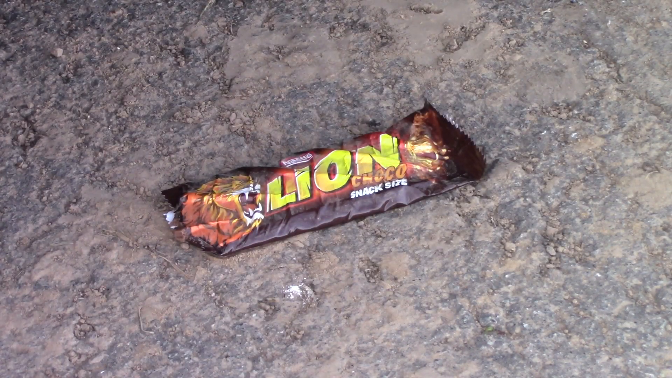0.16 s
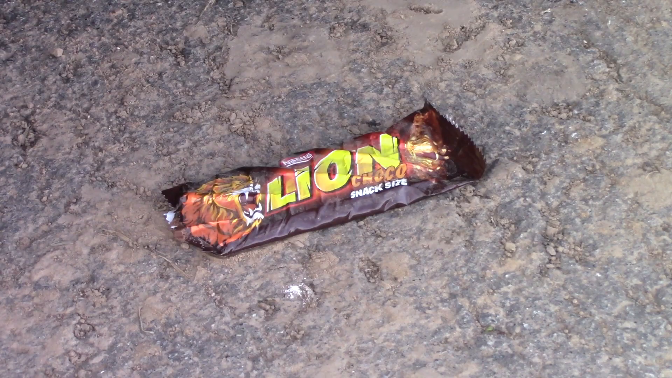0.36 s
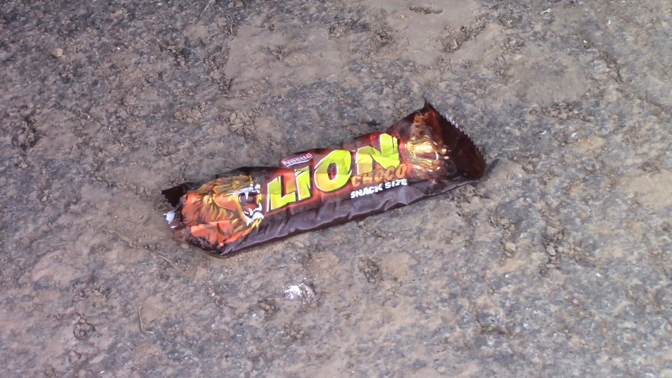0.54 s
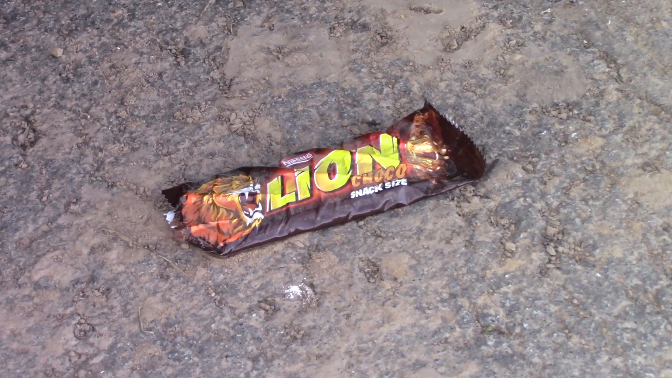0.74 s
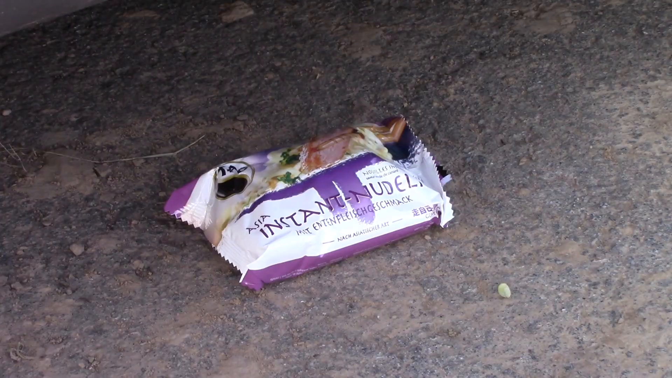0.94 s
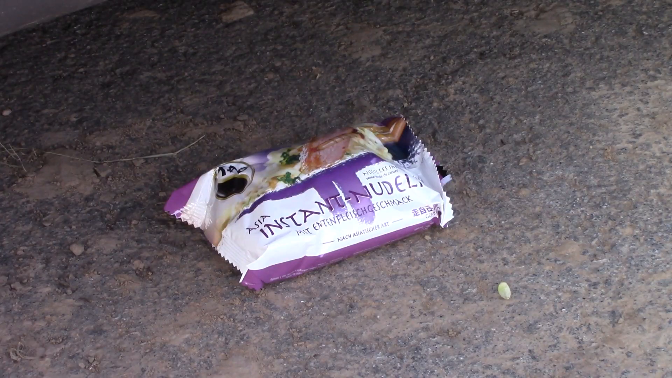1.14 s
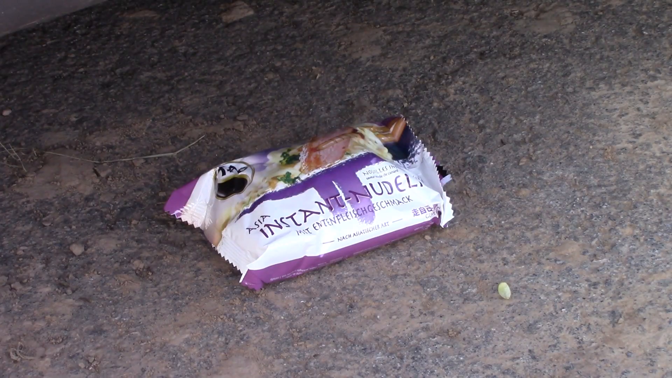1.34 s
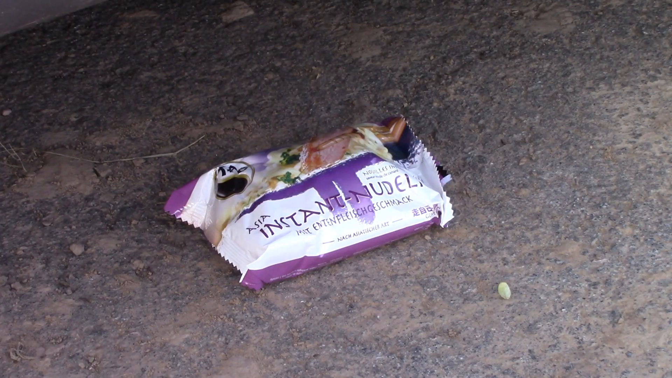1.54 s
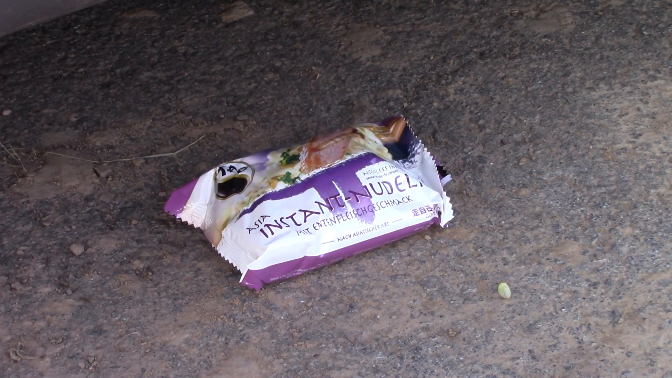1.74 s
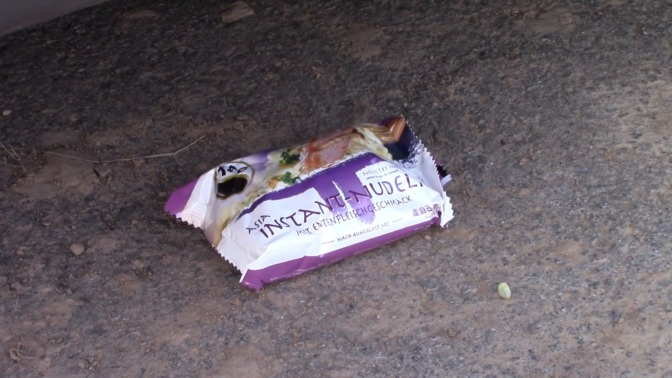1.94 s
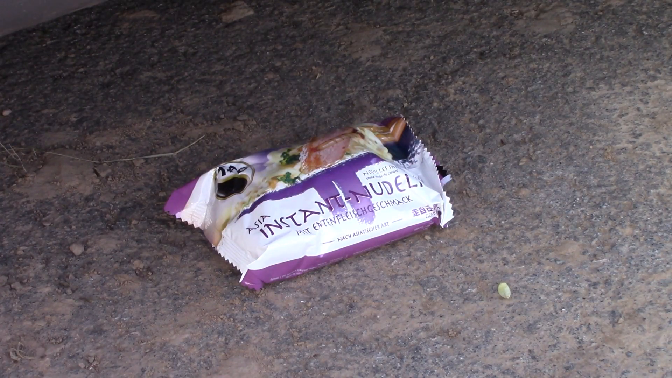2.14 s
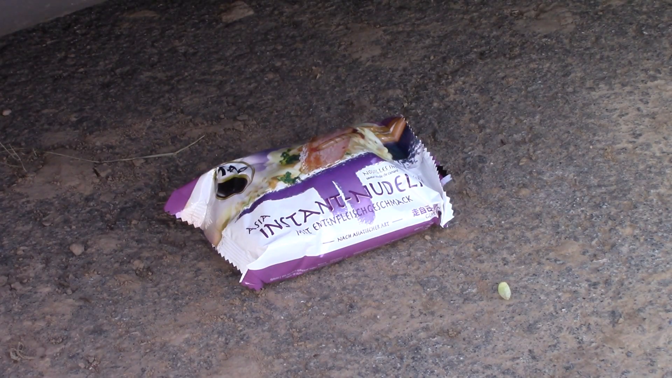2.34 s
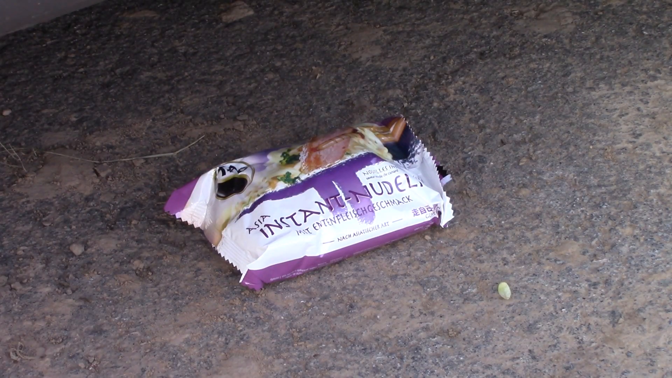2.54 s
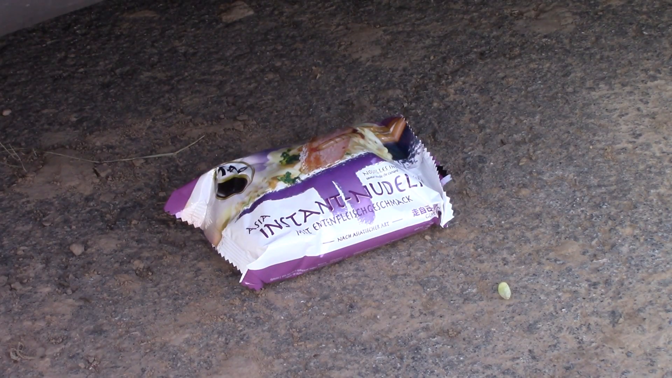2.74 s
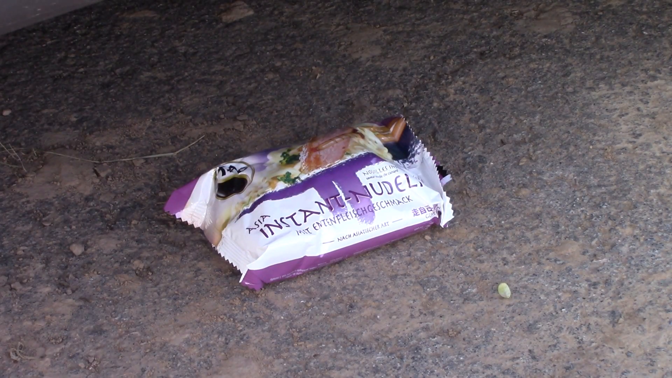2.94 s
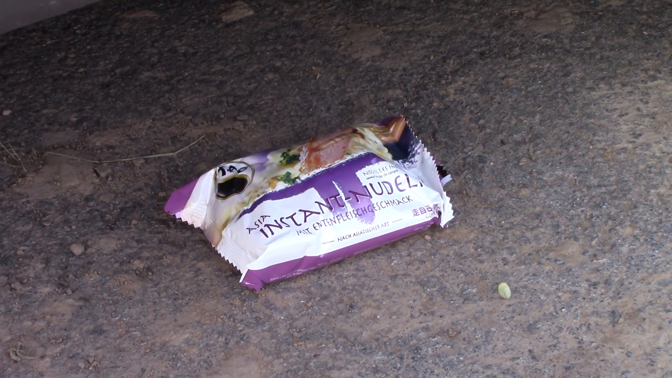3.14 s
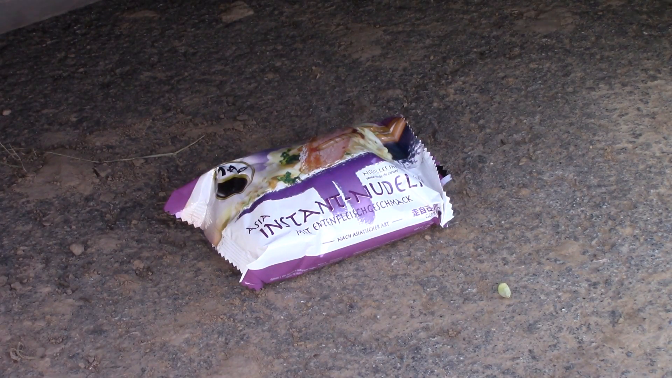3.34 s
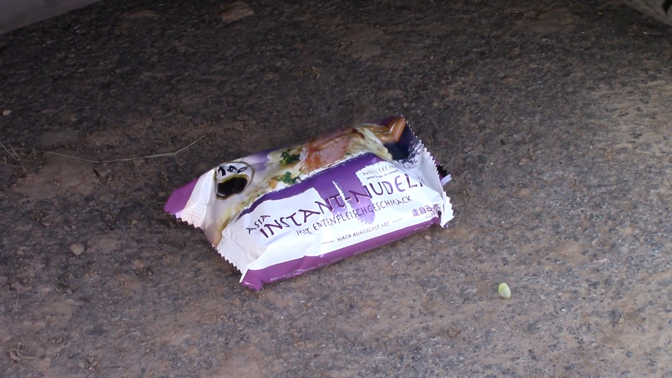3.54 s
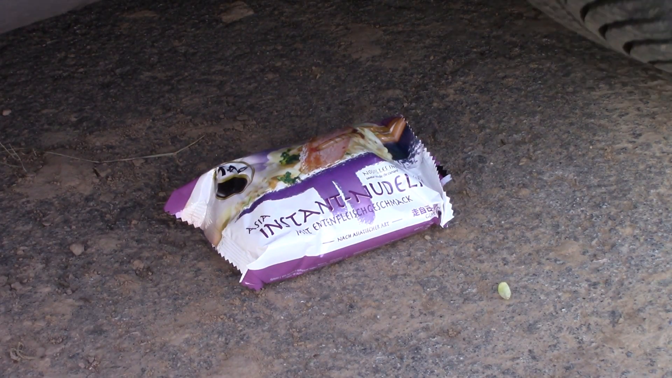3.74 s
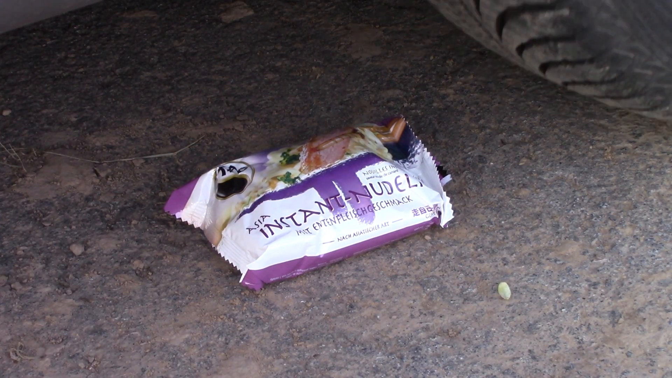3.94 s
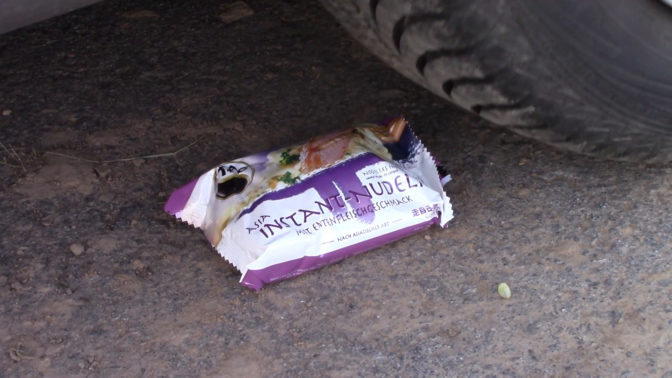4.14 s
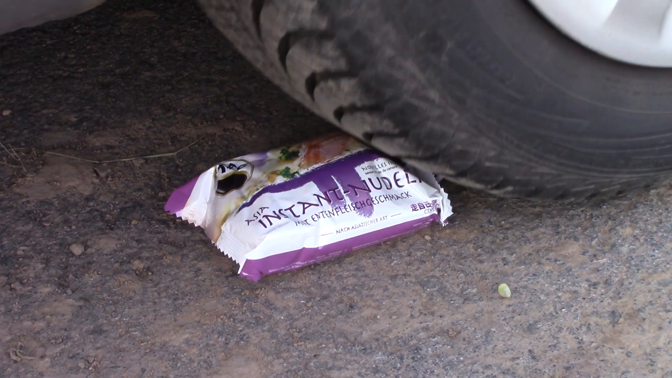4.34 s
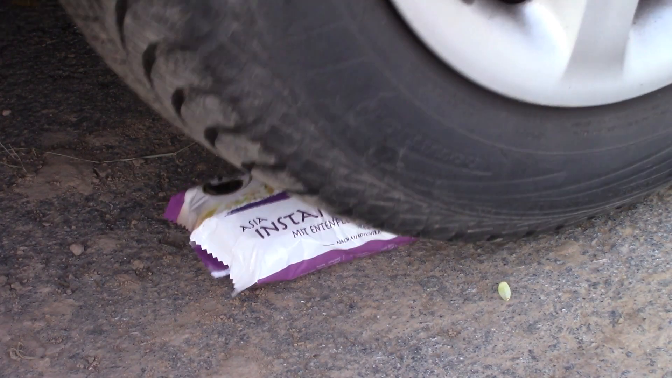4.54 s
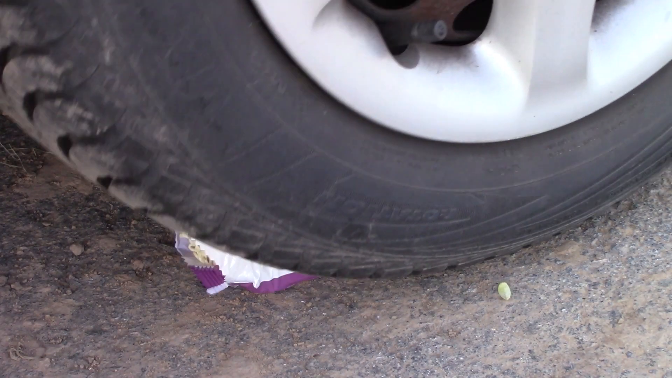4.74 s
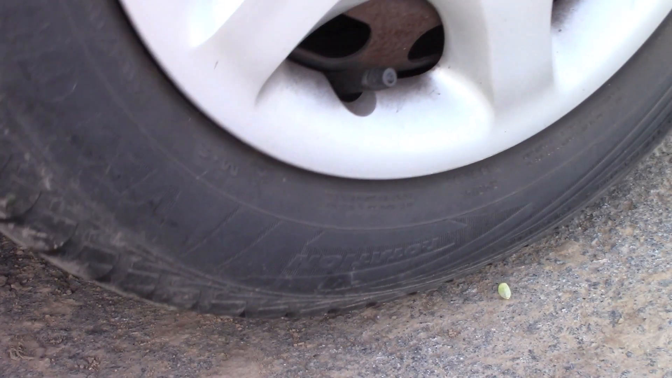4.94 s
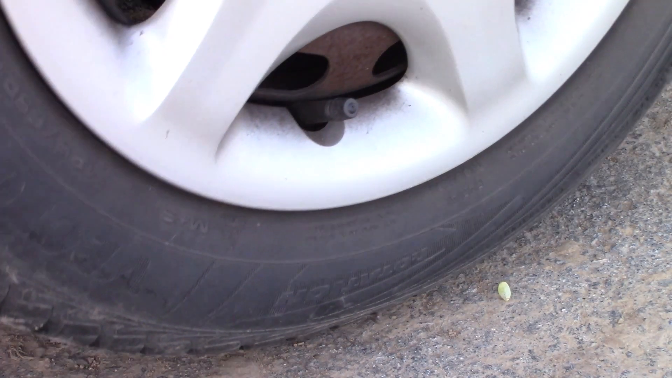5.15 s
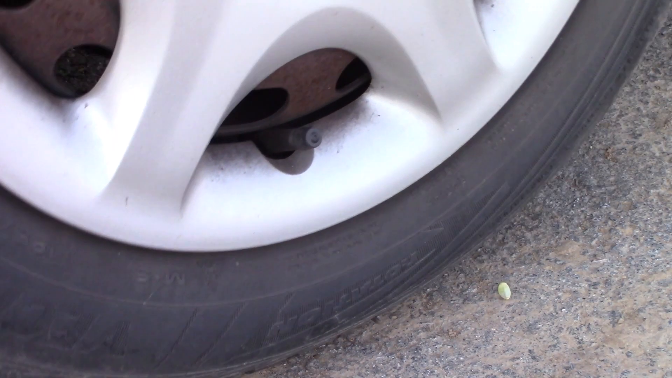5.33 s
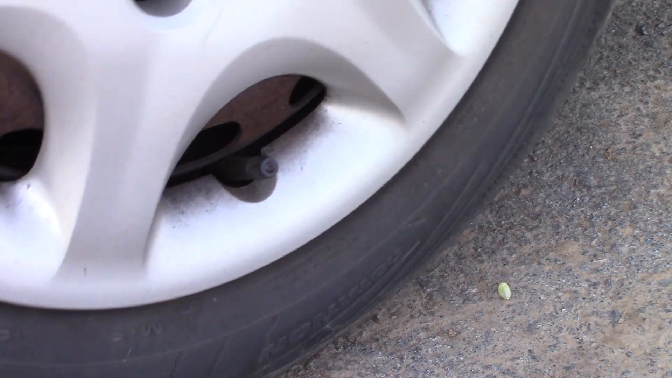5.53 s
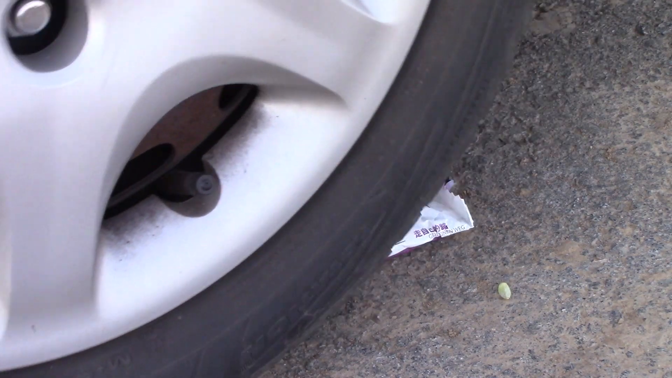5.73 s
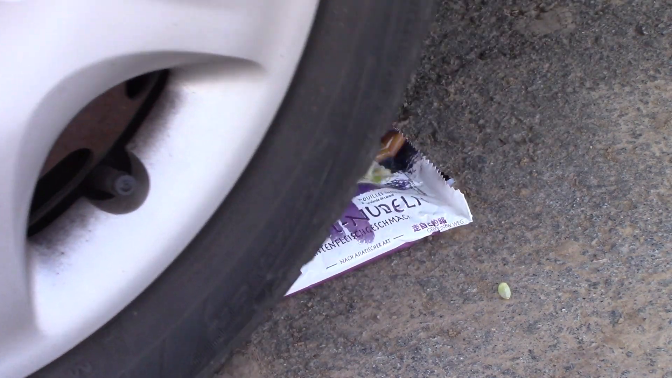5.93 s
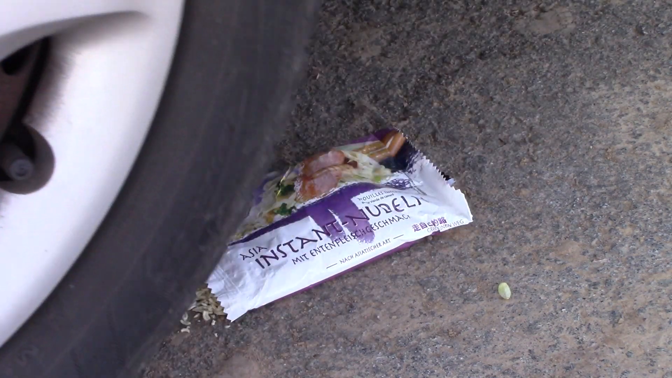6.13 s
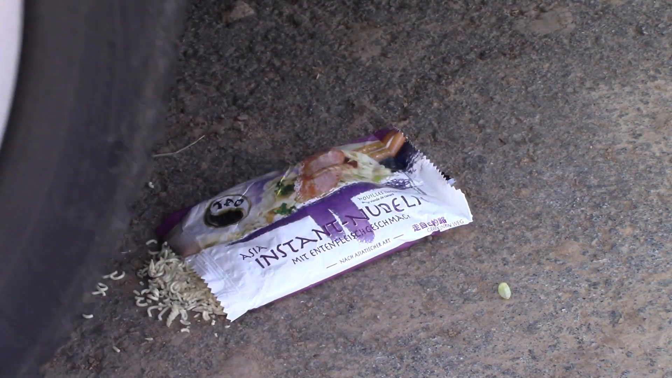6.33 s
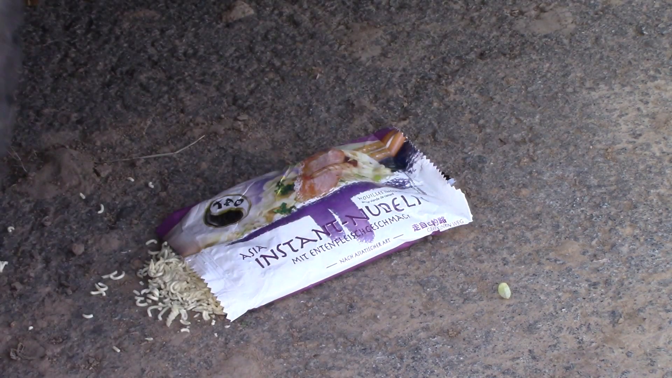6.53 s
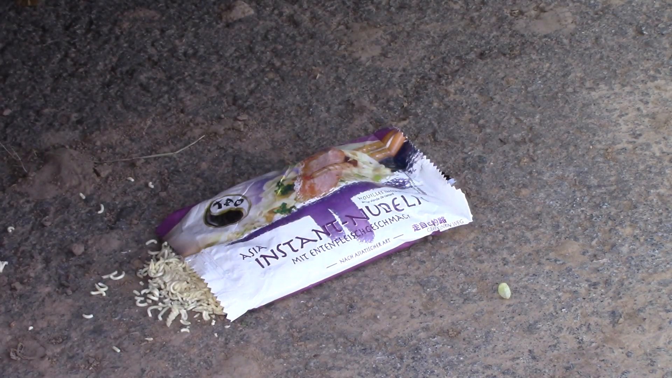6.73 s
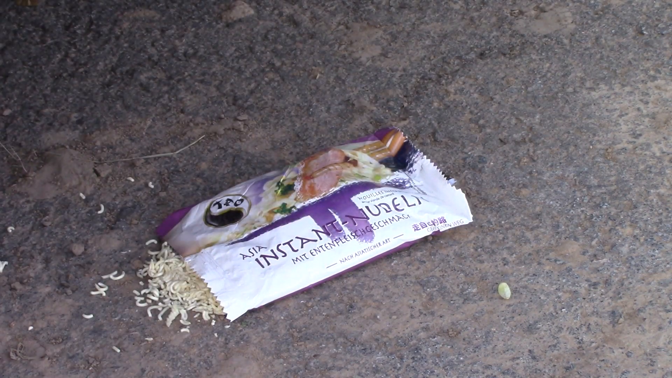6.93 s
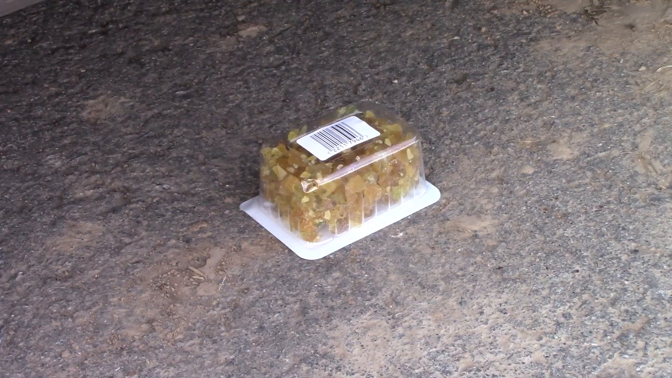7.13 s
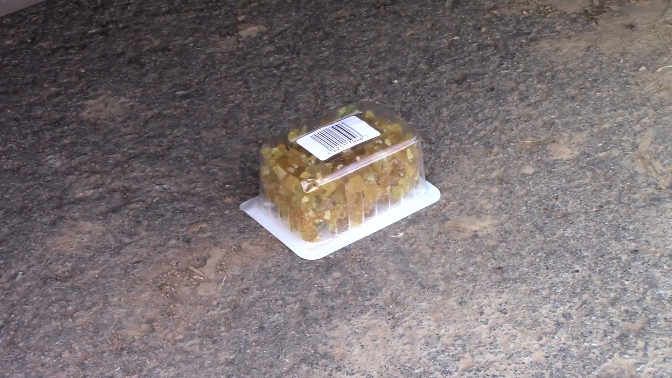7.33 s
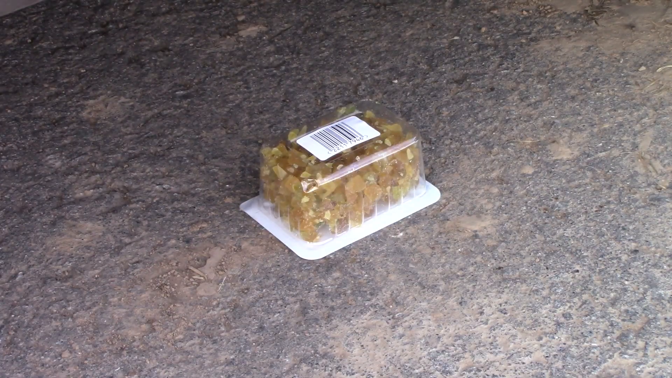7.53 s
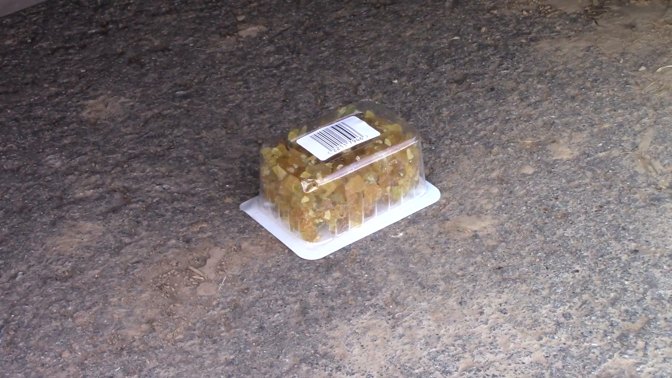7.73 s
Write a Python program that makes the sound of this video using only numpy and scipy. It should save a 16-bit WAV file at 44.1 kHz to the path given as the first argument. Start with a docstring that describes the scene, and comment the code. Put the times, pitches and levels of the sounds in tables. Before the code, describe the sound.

A close microphone beside a slowly rolling car wheel. After low outdoor hiss, a cut to silence and sparse gravel ticks, a dry noodle block breaks under the tyre in thick, crackling bursts with sharp wrapper ticks, hollow wheel resonance and a short echo beneath the car. The crunch thins into separate cracks, then stony pops, a dull tap, silence and faint air.

```python
"""Outdoors on gritty asphalt: a creeping car's tyre crushes a packet of dry instant noodles at the microphone.
Air is coloured noise in three stretches with silence between; grit pops are filtered splinter bursts.
Crumbling is thousands of damped sine grains; fractures and wrapper snaps are bursts, most coloured by the wheel.
Clunks, taps, chirps, a drifting tone, tyre rumble, boom and a short echo under the car complete it."""
import sys
import numpy as np
from scipy import signal
from scipy.fft import rfft, irfft, next_fast_len
from scipy.io import wavfile
from scipy.ndimage import uniform_filter1d, minimum_filter1d, map_coordinates

SR = 44100
rng = np.random.default_rng(int(sys.argv[2]) if len(sys.argv) > 2 else 0)


def output_pcm(signal):
    """Save a mono or channel-first signal as 16-bit PCM at the path in sys.argv[1].

    Samples are clipped to [-1, 1] before scaling.
    """
    pcm = np.clip(np.atleast_2d(signal).T, -1, 1) * 32767
    wavfile.write(sys.argv[1], SR, np.round(pcm).astype(np.int16))


N = 343098
TIME = np.arange(N) / SR
TOP_HZ = 15950
RING = 8192  # samples in one burst or impulse response
# bands: low_hz, high_hz
ZONES = [(20, 2000), (2000, 6000), (6000, 16000)]


def amp(db):
    """Decibels to gain."""
    return 10 ** (np.asarray(db) / 20)


def unit(x):
    """Scale to rms 1."""
    return x / np.sqrt(np.mean(x ** 2) + 1e-30)


def along(points, hz):
    """Interpolate (Hz, value) points on a log frequency axis."""
    f, v = np.transpose(points)
    return np.interp(np.log(hz + 1), np.log(f + 1), v)


def at_time(points, s):
    """Interpolate (s, value) points at times s."""
    return np.interp(s, *np.transpose(points))


def curves(rows):
    """One value per sample for each column after the time."""
    s, *cols = np.transpose(rows)
    return [np.interp(TIME, s, c) for c in cols]


def wobble(rate_hz):
    """Smooth random curve with rate_hz knots a second."""
    knots = rng.standard_normal(int(N * rate_hz / SR) + 4)
    return map_coordinates(knots, [TIME * rate_hz])


def filtered(x, response):
    """Multiply the spectrum of x by a function of frequency."""
    m = next_fast_len(N + RING)
    return irfft(rfft(x, m) * response(np.fft.rfftfreq(m, 1 / SR)), m)[:N]


def noise(response):
    """White noise through a response of frequency."""
    return filtered(rng.standard_normal(N), response)


def zone(hz, lo, hi, order=10):
    """Smooth band-pass gain."""
    return 1 / np.sqrt((1 + (lo / (hz + 1)) ** order) * (1 + (hz / hi) ** order))


def causal(gain):
    """Minimum-phase impulse response with this gain shape, by folding the cepstrum."""
    cepstrum = irfft(np.log(np.maximum(gain / gain.max(), 1e-6)))
    cepstrum[1:RING // 2] *= 2
    cepstrum[RING // 2 + 1:] = 0
    return irfft(np.exp(rfft(cepstrum)))


def add(track, s, sound):
    """Mix a sound in at time s."""
    part = track[max(round(s * SR), 0):][:len(sound)]
    part += sound[:len(part)]


def grains(rate_hz, lo_hz, hi_hz, cycles, spread_db, share=((0, 1),), size=200):
    """Random tiny fractures: damped sines of random pitch and strength; share thins them over time."""
    draw = rng.random((int(rate_hz * N / SR), 4))
    pitch_hz = lo_hz * (hi_hz / lo_hz) ** draw[:, :1]
    strength = amp(spread_db * np.minimum(-np.log(1 - draw[:, 1:2]), 4))
    kept = np.clip(at_time(share, draw[:, 2:3] * N / SR), .02, 1)
    # fewer grains are stronger, so mean power holds
    strength = strength * (draw[:, 3:] < kept) / np.sqrt(kept)
    turns = pitch_hz * np.arange(size) / SR
    waves = strength * np.sqrt(pitch_hz) * np.sin(2 * np.pi * turns) * np.exp(-turns / cycles)
    places = (draw[:, 2:3] * N).astype(int) + np.arange(size)
    return np.bincount(places.ravel(), waves.ravel())[:N]


# sounding stretches: start_s, end_s
STRETCHES = [(0, .533), (.831, 6.739), (7.031, 7.8)]
# outdoor air, a row per stretch, before trim: murmur_db, hiss_db
AIR = [(-52, -54), (-62, -71.5), (-56.8, -60.5)]
# rolling car in the second stretch; CAR_PASS_S: time to creep one microphone distance
CAR_NEAREST_S, CAR_PASS_S, CAR_MURMUR_DB, CAR_HISS_DB = 5.62, 1.335, -52.5, -55.5
SWELL_S, SWELL_WIDTH_S, SWELL_MURMUR_DB, SWELL_HISS_DB = 1.63, 0.11, 7.5, 4.5


def air_levels():
    """Murmur and hiss dB: steady air plus the car by inverse distance, and one brief swell."""
    stretch = np.searchsorted([start for start, end in STRETCHES], TIME, side="right") - 1
    car = (stretch == 1) / np.hypot(1, (TIME - CAR_NEAREST_S) / CAR_PASS_S)
    level = np.hypot(amp(AIR)[stretch].T, amp([[CAR_MURMUR_DB], [CAR_HISS_DB]]) * car)
    swell = np.exp(-((TIME - SWELL_S) / SWELL_WIDTH_S) ** 2)
    return 20 * np.log10(level) + np.outer([SWELL_MURMUR_DB, SWELL_HISS_DB], swell)


# air spectrum: freq_hz, gain_db
AIR_COLOUR = [(25, -21), (80, -16.5), (170, -11), (350, -2), (600, 0.5), (780, 3), (950, 1.5), (1400, 1.5),
              (2300, -5), (4500, -12), (7500, -15.5), (9600, -16), (12000, -26), (16000, -35)]


def air(murmur_trim_db=-0.62, sand_db=-7.0):
    """Coloured-noise murmur and hiss; sand under the tyres is grains that follow the hiss level."""
    murmur_db, hiss_db = air_levels()

    def band(x, lo, hi):
        return unit(filtered(x, lambda hz: amp(along(AIR_COLOUR, hz)) * zone(hz, lo, hi)))

    murmur = band(rng.standard_normal(N), 10, 2500)
    hiss = band(rng.standard_normal(N), 2500, 20000)
    sand = band(grains(220, 1200, 11000, cycles=1.2, spread_db=8), 900, 15000)
    low = amp(murmur_db + murmur_trim_db + 0.56 * wobble(14)) * murmur
    return low + amp(hiss_db) * (hiss + amp(sand_db) * sand)


# distant narrow rushing tone: time_s, pitch_hz, level_db
DRIFT = [(0, 1250, -57), (.3, 1194, -63), (.83, 1224, -72), (1.5, 859, -60.5), (1.9, 1050, -77),
         (2.5, 1198, -63), (4, 1457, -68), (5.8, 800, -66.5), (7.78, 780, -76)]


def drifting_tone(flutter_hz=160):
    """A gliding sine multiplied by low-passed noise becomes a narrow rush."""
    pitch_hz, level_db = curves(DRIFT)
    flutter = unit(noise(lambda hz: zone(hz, 0, flutter_hz, order=4)))
    phase = 2 * np.pi * np.cumsum(pitch_hz) / SR + wobble(90)
    return amp(level_db) * unit(flutter * np.sin(phase))


# faint chirps: centre_s, pitch_hz, peak_db
CHIRPS = [(2.63, 4550, -65), (2.89, 4730, -71), (3.07, 3260, -61), (3.41, 4760, -63), (3.57, 4800, -60),
          (3.74, 4870, -58), (3.92, 5040, -66), (4.11, 5200, -63)]


def chirps(length_s=.05, glide=.025, waver=0.0088):
    """Short thin sine whistles glide a little up or down; glide and waver are pitch fractions."""
    out, u = np.zeros(N), np.linspace(-1, 1, int(length_s * SR))
    for s, hz, db in CHIRPS:
        bend = glide * rng.standard_normal() * u / 2
        shake = unit(uniform_filter1d(rng.standard_normal(len(u)), size=100))
        pitch_hz = hz * (1 + bend + waver * shake)
        tone = np.sin(2 * np.pi * np.cumsum(pitch_hz) / SR)
        add(out, s - length_s / 2, amp(db) * (1 - u ** 2) * tone)
    return out


# dull taps and thuds: envelope_peak_s, pitch_hz, level_db
TAPS = [(.848, 895, -38), (.849, 590, -43), (2.303, 251, -57.5), (5.296, 578, -14.5), (5.705, 596, -32.5),
        (6.631, 580, -30.5)]


def taps(cycles=1.88):
    """Soft contacts: sines that swell and die within a few cycles."""
    out, t = np.zeros(N), np.arange(SR // 10) / SR
    for s, hz, db in TAPS:
        u = hz * t / cycles
        envelope = u ** 2 * np.exp(2 * (1 - u))
        add(out, s - cycles / hz, amp(db) * envelope * np.sin(2 * np.pi * hz * t))
    return out


# double clunk of the running gear: start_s, level_db, brightness_db_per_octave, rise_s, t60_s
CLUNKS = [(1.580, -38, 2.5, 0.0097, 0.056), (1.628, -42.5, 5.5, 0.0022, 0.096)]
# metal modes: freq_hz, gain_db
GEAR = [(170, -13), (310, -4.5), (440, 3), (530, 1.5), (820, -10), (1100, -3), (1200, -5), (1950, -5),
        (2320, -8), (3650, -17)]
# rattle spectrum: freq_hz, gain_db
RATTLE = [(40, -27), (150, -5), (450, -2), (1200, -4), (2400, -7), (4000, -20), (7000, -38), (16000, -53)]


def clunks(rattle_db=-4):
    """Two dull knocks ring the same metal modes at new strengths, plus coloured rattle noise."""
    out, t = np.zeros(N), np.arange(SR // 2) / SR
    for s, db, bright_db, rise_s, t60_s in CLUNKS:
        def tilt_db(hz):
            return bright_db * np.log2(hz + 1)

        ring = np.zeros(len(t))
        for hz, mode_db in GEAR:
            strength = amp(mode_db + tilt_db(hz) + 2 * rng.standard_normal())
            ring += strength * np.sin(2 * np.pi * (hz * t + rng.random()))
        rattle = noise(lambda hz: amp(along(RATTLE, hz) + tilt_db(hz)))[:len(t)]
        shape = (1 - np.exp(-t / rise_s)) ** 2 * amp(-60 * t / t60_s)
        mix = unit(unit(ring) + amp(rattle_db) * unit(rattle))
        add(out, s, amp(db) * mix * shape / shape.max())
    return out


# echo decay under the car: freq_hz, t60_s
TAIL = [(200, 0.083), (1200, 0.24), (5000, 0.17), (14000, 0.052)]


def underbody(x, count=4):
    """Diffuse echo between road and car, 2 ms late; four noise tails crossfade cyclically each second."""
    out = np.zeros(N)
    for k in range(count):
        hz, t, z = signal.stft(rng.standard_normal(SR // 3), SR, nperseg=256)
        decay = amp(-60 * t / along(TAIL, hz)[:, None])
        tail = signal.istft(z * decay, SR, nperseg=256)[1]
        delayed = np.pad(tail / np.linalg.norm(tail), (int(.002 * SR), 0))
        share = np.maximum(np.cos(2 * np.pi * (TIME - k / count)), 0) ** 2
        out += signal.fftconvolve(x * share, delayed)[:N]
    return out


# resonances of wheel and gap beneath, boost before ringing factor: centre_hz, width_hz, boost_db
WHEEL = [(248, 18, 7), (590, 56, 7.5), (747.5, 64, 5.5), (1054, 45, 2.5), (1200, 71, 4), (1370, 70, 2),
         (1750, 35, 2.5), (2530, 90, -0.5)]


def wheel_db(hz):
    """Sum of resonance boosts of the wheel."""
    return sum(db / (1 + (2 * (hz - centre) / width) ** 2) for centre, width, db in WHEEL)


PITCH_OCTAVES = .38  # width of the pitch emphasis


def bursts(rows, colour, ringing, splinters, pitch_db, variety_db, trim_db):
    """Each break is one push plus a swelling, dying splinter shower; level is rms over 10 ms before trim."""
    out, t, hz = np.zeros(N), np.arange(RING) / SR, np.fft.rfftfreq(RING, 1 / SR)
    knots_hz = np.geomspace(300, TOP_HZ, 24)
    body_db = along(colour, hz) + ringing * wheel_db(hz)
    for s, *levels_db, pitch_hz, span_s in rows:
        # each fragment has its own pitch and colour
        note_db = pitch_db * np.exp(-(np.log2((hz + 1) / pitch_hz) / PITCH_OCTAVES) ** 2)
        luck = along(np.c_[knots_hz, rng.standard_normal(len(knots_hz))], hz)
        own = amp(body_db + note_db + variety_db * luck)
        power = sum((amp(db) * unit(own * zone(hz, lo, hi))) ** 2
                    for db, (lo, hi) in zip(levels_db, ZONES))
        age = t / (span_s + 1e-5)
        draw = rng.standard_normal(RING)
        shower = draw * np.abs(draw) * np.sqrt(age) * np.exp(-age)
        # longer break: first push counts less
        force = shower / np.linalg.norm(shower) * np.sqrt(splinters * span_s)
        force[0] = 1
        sound = signal.fftconvolve(force, causal(np.sqrt(power)))[:RING]
        size = np.linalg.norm(amp(levels_db)) * np.sqrt(SR / 100)
        add(out, s, amp(trim_db) * size * sound / np.linalg.norm(sound))
    return out


def shared(db, balance_db):
    """Share a level out between the three bands."""
    return db + balance_db - 20 * np.log10(np.linalg.norm(amp(balance_db)))


# nominal band centres, plain values: centre_hz
ZONE_HZ = (1100, 3500, 9000)


def around(db, pitch_hz, fall_db):
    """Band levels that fall by fall_db for each octave from the pitch."""
    return shared(db, -fall_db * np.abs(np.log2(np.divide(ZONE_HZ, pitch_hz))))


SHORT_BREAK_S = .0005  # splintering time of a foil crease or grit ping
# fine grit as the tread rolls off; level before trims
PING_FROM_S, PING_TO_S, PING_DB, PING_SPREAD_DB, PING_HZ = 5.75, 6.4, -50.5, 4, 4800
# grit under the tread, level before trims: start_s, level_db, pitch_hz, splintering_s
GRIT = [(.2214, -43, 1400, .003), (0.232, -39.5, 1400, 0.003), (0.2545, -36, 1900, 0.0039),
        (0.4332, -41.5, 2820, .0036), (0.4879, -44.5, 2200, 0.00077), (1.2401, -47.5, 2100, 0.0011),
        (1.4528, -54.5, 3300, .003), (2.282, -50.5, 3200, 0.00076), (2.675, -42, 1600, .0015),
        (3.118, -45, 1300, 0.002), (3.3302, -49, 9030, 0.00053), (3.5508, -49.5, 1800, 0.00055),
        (3.785, -39.5, 5400, 0.0016), (3.8874, -29, 2000, .0001), (5.685, -29.5, 1580, .0036),
        (5.7043, -29, 990, 0.0009), (5.7296, -30.5, 1200, 0.002), (5.863, -42.5, 2700, .001),
        (5.9026, -38, 1294, 0.00074), (5.9137, -41, 2300, 0.00058), (5.9472, -39.5, 1300, 0.00088),
        (5.9552, -25, 1160, 0.00095), (6.0056, -36, 1170, .0025), (6.2379, -36, 1090, 0.0029),
        (6.5146, -47.5, 1990, .003), (6.6084, -39, 6500, 0.0044), (6.6286, -28, 1190, 0.0066),
        (6.7035, -40.5, 1406, .001), (7.034, -49.5, 7500, 0.0055), (7.131, -48.5, 1630, 0.0042),
        (7.2668, -51, 1444, .0028), (7.386, -50.5, 4500, .001), (7.5464, -42.5, 1300, .0005)]


def stones(fall_db=6.5, mid_db=1, high_db=-2.0, count=12):
    """Stones pop, brighter at higher pitch; fine grit pings at random behind the packet."""
    middle_s, half_s = (PING_FROM_S + PING_TO_S) / 2, (PING_TO_S - PING_FROM_S) / 2
    pings = [(middle_s + half_s * luck[0], PING_DB + PING_SPREAD_DB * luck[1],
              PING_HZ * 2 ** luck[2], SHORT_BREAK_S)
             for luck in rng.uniform(-1, 1, (count, 3))]
    return [(s, *(around(db, pitch_hz, fall_db) + [0, mid_db, high_db]), pitch_hz, span_s)
            for s, db, pitch_hz, span_s in [*GRIT, *pings]]


def tread(packet, rumble_db=-52.0, top_hz=150):
    """The tyre settles on the block: low noise whose power follows the level of the breaking."""
    effort = np.sqrt(np.abs(uniform_filter1d(packet ** 2, size=900)))
    return amp(rumble_db) * effort * unit(noise(lambda hz: zone(hz, 45, top_hz, order=4)))


LOAD_S, LOAD_WIDTH_S, BOOM_DB, BOOM_HZ = 5.17, .25, -4.5, 660


def boom(packet, lowest_hz=100):
    """Under full weight the breaking drives the tyre: its low band is added around LOAD_S."""
    load = np.exp(-((TIME - LOAD_S) / LOAD_WIDTH_S) ** 2)
    return amp(BOOM_DB) * load * filtered(packet, lambda hz: zone(hz, lowest_hz, BOOM_HZ))


# crumbling low band before trim: time_s, level_db
EFFORT = [(4.145, -55), (4.195, -22.5), (4.22, -35), (4.28, -16), (4.39, -15.5), (4.57, -19.5),
          (4.72, -16.5), (4.785, -20.5), (4.85, -28.5), (4.94, -26), (5.13, -28.5), (5.32, -26),
          (5.36, -38), (5.5, -29), (5.65, -37), (5.78, -63)]
# treble over low band, dull once the tyre covers the packet: time_s, treble_db
TREBLE = [(4.2, -4.5), (4.35, -2), (4.65, 3.5), (4.85, 1), (5.05, -1.5), (5.7, -7)]
MID_DB, MID_FOLLOWS = -1.5, 0.15  # middle band over low; its share of the treble change


def crumble_levels(s):
    """Low, middle and high band dB of the crumbling at times s, before trim."""
    effort_db, treble_db = at_time(EFFORT, s), at_time(TREBLE, s)
    return np.array([effort_db, effort_db + MID_DB + MID_FOLLOWS * treble_db, effort_db + treble_db])


def uneven_times(count):
    """Jittered moments over the crush."""
    return np.interp(np.arange(count) + rng.random(count), [0, count], [EFFORT[1][0], EFFORT[-2][0]])


# share of the block still breaking up: time_s, share_0_to_1
BREAKING_SHARE = [(4.2, 0.47), (4.3, 0.98), (4.78, 0.95), (4.88, 0.71), (5.3, 0.57), (5.4, 0.32)]
# crumbling spectrum: freq_hz, gain_db
CRUMBLE_COLOUR = [(24, -54.5), (60, -38.5), (130, -34), (215, -23.5), (260, -17.5), (420, -6.5),
                  (600, -11.5), (1040, 0.5), (2440, 0.5), (3300, -4), (5400, -5.5), (6600, -14.5),
                  (9220, -7.5), (12100, -20.5), (14100, -18.5), (16000, -31)]


def crumble(clump_db=2.0, ringing=0.94, trim_db=-2.0, wrapper_db=-5):
    """Noodle strands break by the thousand as clumped grains while foil creases crinkle."""
    clumps = amp(clump_db * wobble(260))
    sizes = [grains(1800, 600, 2400, cycles=0.65, spread_db=1.5, share=BREAKING_SHARE),
             grains(1700, 2000, 7000, cycles=0.6, spread_db=1.5, share=BREAKING_SHARE),
             grains(1900, 5000, 14500, cycles=0.34, spread_db=0.5, share=BREAKING_SHARE)]

    def band(x, lo, hi):
        return unit(filtered(x, lambda hz: zone(hz, lo, hi)
                             * amp(along(CRUMBLE_COLOUR, hz) + ringing * wheel_db(hz))))

    levels_db = crumble_levels(TIME)
    out = np.zeros(N)
    for strands, (lo, hi), db in zip(sizes, ZONES, levels_db):
        out += amp(db + trim_db) * band(strands * clumps, lo, hi)
    creases = grains(170, 5300, 13000, cycles=2.4, spread_db=6.5)
    out += amp(levels_db[-1] + wrapper_db) * band(creases, 3000, TOP_HZ)
    return out * (TIME > EFFORT[0][0]) * (TIME < EFFORT[-1][0])


# small wrapper ticks: level over crumbling treble before trim, scatter, typical pitch
TICK_DB, TICK_SPREAD_DB, TICK_HZ = 2, 1, 7500
# sharp wrapper snaps, level before trim: start_s, level_db, pitch_hz
SNAPS = [(4.1945, -16, 8500), (4.235, -17, 3140), (4.7765, -9, 9000), (4.8595, -21, 9000),
         (4.9385, -16.5, 5470), (4.9911, -29.5, 8730), (5.059, -20.5, 4600), (5.079, -20, 9350),
         (5.329, -24, 9350), (5.337, -22, 9900), (5.352, -28.5, 2580), (5.3973, -23.5, 8700),
         (5.4149, -25.5, 7300), (5.4514, -19, 2280), (5.5125, -14, 3850), (5.6357, -27, 2970),
         (5.649, -28, 8950)]


def snaps(fall_db=4.5, count=30):
    """Foil creases give way in single bright ticks, some loud and many small."""
    small = [(s, crumble_levels(s)[-1] + TICK_DB + TICK_SPREAD_DB * luck[0], TICK_HZ * 2 ** (luck[1] / 2))
             for s, luck in zip(uneven_times(count), rng.uniform(-1, 1, (count, 2)))]
    return [(s, *around(db, pitch_hz, fall_db), pitch_hz, SHORT_BREAK_S)
            for s, db, pitch_hz in [*SNAPS, *small]]


CRACK_HZ, CRACK_SCATTER_OCTAVES = 1280, .12
# level over crumbling before trim, scatter, typical splintering time
SMALL_CRACK_DB, SMALL_CRACK_SPREAD_DB, SMALL_CRACK_S = -.5, 3, 0.0022


def small_fractures(count=52):
    """Lesser breaks come unevenly, with level and brightness scattered around the crumbling."""
    return [(s, *(crumble_levels(s) + SMALL_CRACK_DB + SMALL_CRACK_SPREAD_DB * luck[:3]),
             CRACK_HZ * 2 ** (luck[3] / 2), SMALL_CRACK_S * 2 ** (luck[4] / 2))
            for s, luck in zip(uneven_times(count), rng.standard_normal((count, 5)))]


# loud fractures, levels before trims: start_s, level_db, treble_db, splintering_s
CRACKS = [(4.1562, -30.5, -4.5, .003), (4.175, -19.5, 1.5, 0.0025), (4.1866, -21, -17, 0.0019),
          (4.2686, -10.5, 3, 0.004), (4.3011, -14, 0, .003), (4.3325, -15, 7, 0.0019),
          (4.3912, -9.5, -9.5, 0.0046), (4.5303, -11.5, 8.5, 0.0042), (4.5719, -16, 0.5, 0.0029),
          (4.6354, -12.5, 1.5, .004), (4.7386, -17, -7, 0.0021), (4.7875, -12.5, -10.5, 0.0026),
          (4.8053, -8, -6, 0.0016), (4.877, -10, 0, .0054), (4.8917, -17, -5.5, 0.0023),
          (4.918, -23, 2, 0.0024), (4.925, -15.5, -10, 0.0036), (4.9605, -14, -4.5, 0.0036),
          (5.0053, -12.5, -3, 0.0049), (5.0186, -19.5, -1, .0033), (5.0407, -21, -4, 0.0022),
          (5.0531, -14.5, -12, 0.00041), (5.0752, -14, -12.5, .0008), (5.086, -15, -7, 0.002),
          (5.1142, -17.5, -4.5, 0.00063), (5.1437, -11, -5, 0.0039), (5.1679, -15.5, -4, 0.0045),
          (5.1821, -18.5, -5, 0.01), (5.2082, -9.5, -2, 0.00048), (5.2578, -22.5, -5.5, 0.0062),
          (5.2942, -8.5, -8, 0.003), (5.3072, -14.5, -13.5, 0.0032), (5.436, -18.5, -13, 0.00051),
          (5.4864, -24, -5, 0.0039), (5.5042, -17, -3, 0.0055), (5.5484, -12.5, -14.5, .0007),
          (5.5984, -25, -10, .003), (5.611, -20, -5, 0.0039)]


def fractures(mid_db=-0.16, high_db=-1.85):
    """Loud breaks of the block lie near one pitch and differ in brightness."""
    pitches_hz = CRACK_HZ * 2 ** (CRACK_SCATTER_OCTAVES * rng.standard_normal(len(CRACKS)))
    return [(s, *shared(db, np.array([0, treble_db + mid_db, treble_db + high_db])), pitch_hz, span_s)
            for (s, db, treble_db, span_s), pitch_hz in zip(CRACKS, pitches_hz)]


# fracture spectrum: freq_hz, gain_db
CRACK_COLOUR = [(30, -60.5), (120, -46), (220, -19), (450, -6), (900, 2), (1400, 4.5), (2000, -2.5),
                (3500, -7.5), (5200, -8), (6800, -13), (9300, -8.5), (12000, -22.5), (14000, -19.5),
                (16000, -25.5)]
# grit spectrum: freq_hz, gain_db
GRIT_COLOUR = [(30, -43), (200, -36), (480, -1.5), (1000, 6.5), (1600, 3), (3000, -5), (6000, -12),
               (10000, -14.5), (12500, -29.5), (16000, -31)]


def scene():
    """Mix the packet at the microphone with grit, their echo, the car and the air."""
    breaks = fractures() + snaps() + small_fractures()
    cracks = bursts(breaks, CRACK_COLOUR, ringing=1.3, splinters=2500,
                    pitch_db=4.5, variety_db=3.5, trim_db=-1.4)
    packet = crumble() + cracks
    grit = bursts(stones(), GRIT_COLOUR, ringing=0, splinters=1500,
                  pitch_db=6.0, variety_db=3.5, trim_db=-1.5)
    echo = underbody(amp(-12.5) * packet + amp(-13) * grit)
    background = air() + drifting_tone() + chirps() + taps() + clunks()
    return (background + echo + grit + tread(packet) + boom(packet) + packet)[None]


FLOOR_DB = -74  # microphone hiss


def record(dry):
    """Microphone hiss, silence between stretches, a fast limiter near full scale, and the band limit."""
    live = sum((TIME >= start) & (TIME < end) for start, end in STRETCHES)
    hiss = unit(noise(lambda hz: zone(hz, 6000, TOP_HZ, order=4)))
    x = (dry[0] + amp(FLOOR_DB) * hiss) * live
    needed_gain = .97 / np.maximum(np.abs(x), .97)
    x = x * uniform_filter1d(minimum_filter1d(needed_gain, size=25), size=21)
    return filtered(x, lambda hz: zone(hz, 0, TOP_HZ, order=200))[None]


dry = scene()
out = record(dry)
output_pcm(out)
```